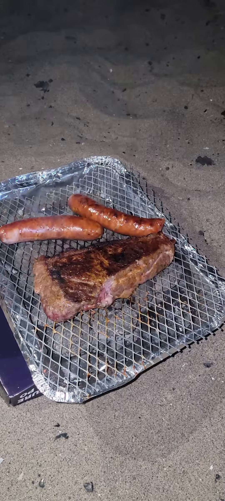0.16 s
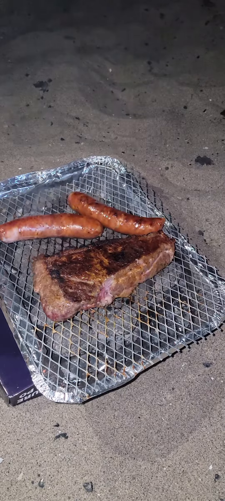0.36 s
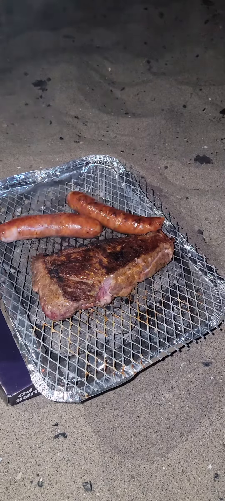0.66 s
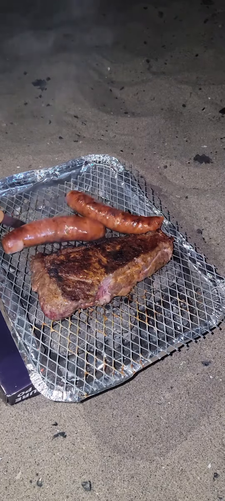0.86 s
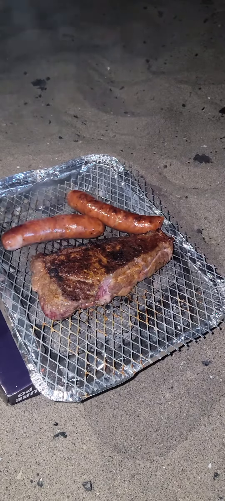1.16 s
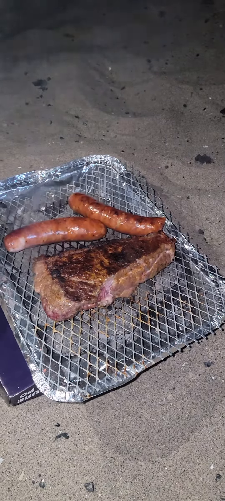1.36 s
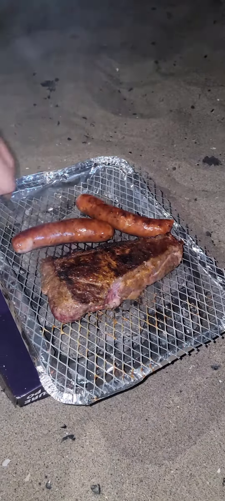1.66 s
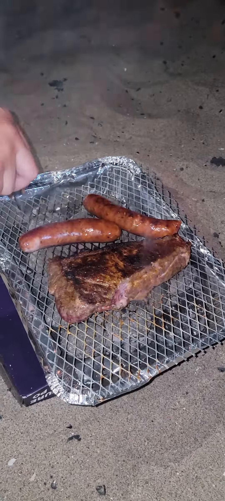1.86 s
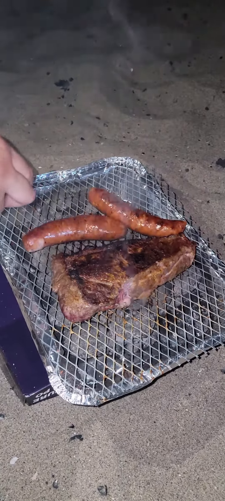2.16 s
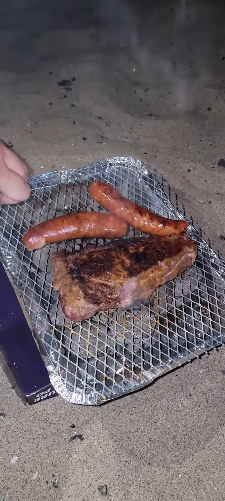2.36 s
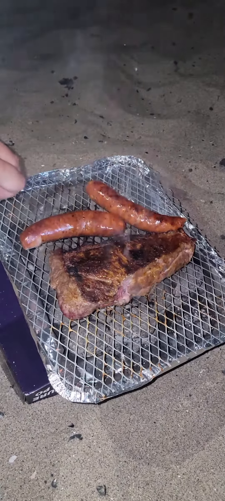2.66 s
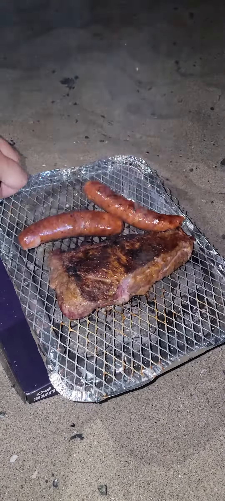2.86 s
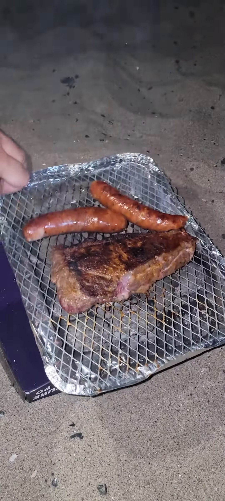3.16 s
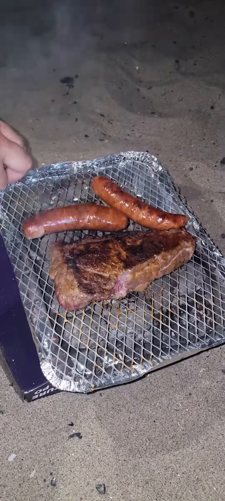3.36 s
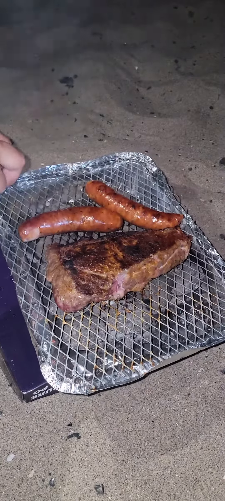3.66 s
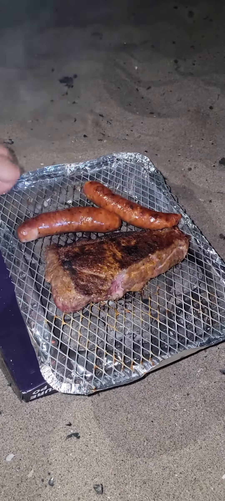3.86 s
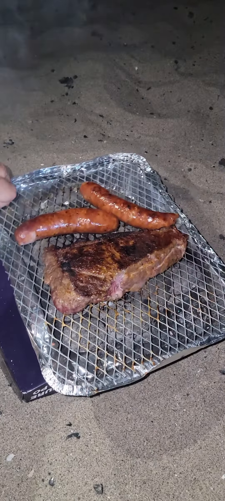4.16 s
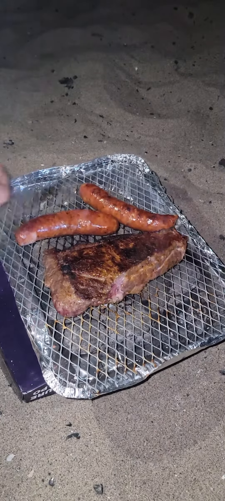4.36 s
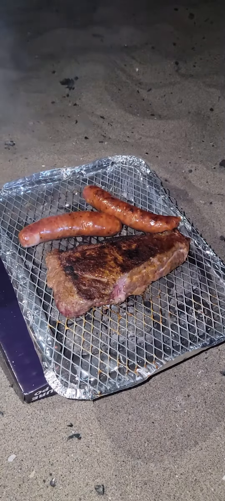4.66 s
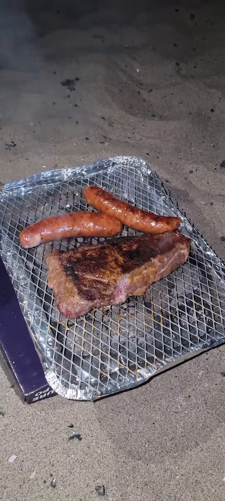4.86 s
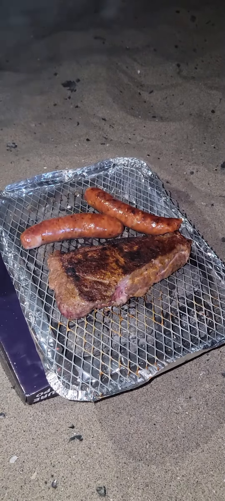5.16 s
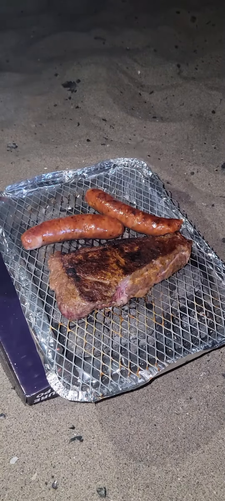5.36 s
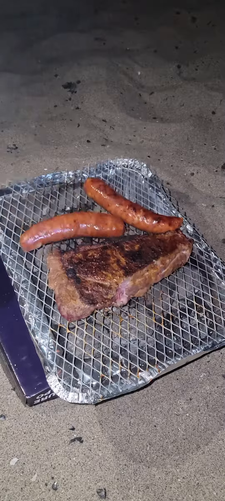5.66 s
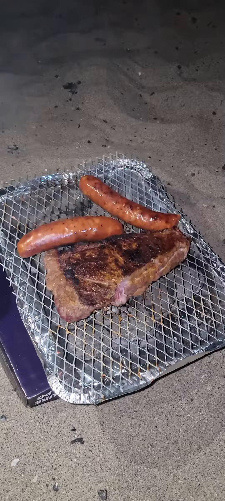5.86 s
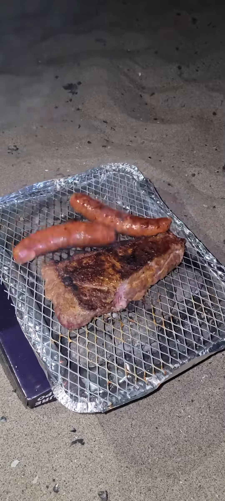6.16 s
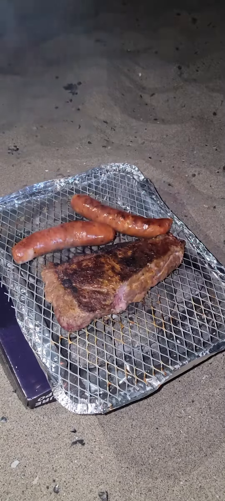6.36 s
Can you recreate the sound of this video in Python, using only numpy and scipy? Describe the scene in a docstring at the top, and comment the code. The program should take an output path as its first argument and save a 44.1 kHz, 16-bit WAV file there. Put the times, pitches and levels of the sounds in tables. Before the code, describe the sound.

A quiet outdoor barbecue heard close up: irregular brittle ticks and crackles with a tinny foil edge, small scratchy rustles and delicate hissing fat. Underneath lie a deep steady rumble and faint air, opening with soft low bumps. Crackling clusters before three seconds, spikes around four and a half as the rumble thins, and becomes busiest and loudest in the last second. A faint low hum swells occasionally.

```python
"""Dry crackles and clicks of meat cooking on a small foil charcoal grill: noise bursts excite tray modes.
Short gritty rustles are dense friction noise with pops, radiated through the same modes.
Fat sizzles as modulated noise with bubble ticks and a few spits; embers tick as random impulses.
Behind lie a low outdoor rumble and a wash of air (shaped noise), a distant wavering hum and soft thuds."""
import sys
import numpy as np
from scipy import signal
from scipy.fft import rfft, irfft
from scipy.io import wavfile
from scipy.ndimage import uniform_filter1d

SR = 44100
rng = np.random.default_rng(int(sys.argv[2]) if len(sys.argv) > 2 else 0)


def wav_out(sig):
    """Save sig, one row per channel (or a flat mono array), as 16-bit PCM at SR to the path in sys.argv[1]."""
    wavfile.write(sys.argv[1], SR, np.round(np.clip(np.atleast_2d(sig).T, -1, 1) * 32767).astype(np.int16))


N = 287532
TIME = np.arange(N) / SR


def amp(db):
    """Logarithmic level law: decibels to amplitude gain."""
    return 10 ** (np.asarray(db) / 20)


def unit(x):
    """Power normalisation: scales to rms 1."""
    return x / np.sqrt(np.mean(x ** 2) + 1e-20)


def add(mix, start_s, sound):
    """Superposition: mixes a stereo sound in at a start time."""
    part = mix[:, max(round(start_s * SR), 0):][:, :sound.shape[1]]
    part += sound[:, :part.shape[1]]


def pan(side_db):
    """Interaural level difference: left and right gains, positive to the left."""
    return amp(np.array([[side_db], [-side_db]]) / 2)


def level_curve(points):
    """Slow level envelope: straight lines in decibels between the given times."""
    return np.interp(TIME, *np.transpose(points))


def colour(points, hz):
    """Spectral envelope: gain interpolated in decibels over log frequency."""
    point_hz, point_db = np.transpose(points)
    return amp(np.interp(np.log(hz + 1), np.log(point_hz + 1), point_db))


def shaped(x, points):
    """Linear filtering in the frequency domain: gives a long sound a colour, at rms 1."""
    hz = np.fft.rfftfreq(N, 1 / SR)
    return unit(irfft(rfft(x) * colour(points, hz), N))


def causal(gain):
    """Minimum phase from the Hilbert transform of log gain: responses ring after a blow, never before."""
    mirrored = np.c_[gain, gain[:, -2:0:-1]]
    log_gain = np.log(np.maximum(mirrored, 1e-5))
    return np.exp(np.conj(signal.hilbert(log_gain)))[:, :gain.shape[1]]


def wander(corner_hz):
    """Low-passed Gaussian noise: slow random variation of rms 1, falling off above the corner."""
    hz = np.fft.rfftfreq(N, 1 / SR)
    return unit(irfft(rfft(rng.standard_normal(N)) / (1 + (hz / corner_hz) ** 4), N))


def pair(size, alike):
    """Partial coherence: white noise at two microphone ports with correlation `alike`."""
    left, other = rng.standard_normal((2, size))
    return np.array([left, alike * left + np.sqrt(1 - alike ** 2) * other])


def grains(size, depth_db, length_s):
    """Clustering of tiny fractures and slips: smoothed noise as an uneven gain of rms 1."""
    clumps = unit(uniform_filter1d(rng.standard_normal(size), int(length_s * SR)))
    return unit(amp(depth_db * clumps))


def decays(impulses, decay_s):
    """Exponential decay: a one-pole filter lets every impulse die away."""
    return signal.lfilter([1], [1, -np.exp(-1 / (decay_s * SR))], impulses)


def peak(hz, centre_hz, width_hz):
    """Lorentzian resonance: power curve of one damped mode."""
    return 1 / (1 + (2 * (hz - centre_hz) / width_hz) ** 2)


def ring(hz, centre_hz, share, lift_db):
    """Constant-Q resonance: lifts one mode whose width is a share of its pitch."""
    return np.sqrt(1 + amp(lift_db) ** 2 * peak(hz, centre_hz, share * centre_hz))


def ripple(hz, depth_db, width_hz=220):
    """Local modal variation: random peaks and dips for one spot on the grill."""
    heights = rng.standard_normal(len(hz))
    return amp(depth_db * np.interp(hz, width_hz * np.arange(len(hz)), heights))


# Left-over-right difference between the ports hearing the grill: frequency_hz, difference_db
PORT_DIFFERENCE = [(150, -7.5), (280, -5.5), (420, 5.5), (700, 4), (1300, -0.5), (2500, -2.5), (8000, 2.5),
                   (15000, -0.5)]


def ports(gain, hz):
    """Direction-dependent response: the two ports hear one colour a little differently."""
    tilt = np.sqrt(colour(PORT_DIFFERENCE, hz))
    return np.array([gain * tilt, gain / tilt])


# Resonances of the tray: centre_hz, width_hz, lift_db
TRAY_MODES = [(556, 73, 2.5), (600, 30, -12), (969, 17, 5.5), (1110, 110, 4.5), (1241, 28, 5.5),
              (1641, 29, 4.5), (2120, 20, -6), (2536, 29, 3.5), (2756, 36, 4), (2970, 52, 3.5),
              (3172, 57, 5), (3550, 68, 1), (3926, 84, 5.5), (6070, 290, -5), (8970, 1100, 3)]


def tray(points, hz):
    """Modal superposition: the tray's resonances stand out of a broad colour."""
    modes = sum(amp(db) ** 2 * peak(hz, centre, width) for centre, width, db in TRAY_MODES)
    return colour(points, hz) * np.sqrt(1 + modes)


def voiced(drive, gain, low_db, treble_db, low_edge_hz=900, treble_edge_hz=4500):
    """Source-filter principle: a drive rings a colour; low and treble levels are set against the middle band."""
    size = drive.shape[1]
    hz, spectrum = np.fft.rfftfreq(size, 1 / SR), rfft(drive)
    low = 1 / (1 + (hz / low_edge_hz) ** 8)
    below_treble = 1 / (1 + (hz / treble_edge_hz) ** 8)
    power = 2 / size * np.mean(abs(spectrum * gain) ** 2, 0)
    bands = zip((low, below_treble - low, 1 - below_treble), (low_db, 0, treble_db))
    balance = sum(band * amp(db) / np.sqrt(np.sum(power * band)) for band, db in bands)
    return irfft(spectrum * causal(gain * balance), size)


# Colour of the outdoor rumble: frequency_hz, gain_db
RUMBLE_COLOUR = [(12, -28), (20, -29), (55, -2), (75, 1), (174, -8), (206, -12), (260, -11.5), (297, -16),
                 (450, -30.5), (580, -81), (990, -120)]
# Relative level of the rumble over time: time_s, level_db
RUMBLE_LEVEL = [(0.0, -34), (0.14, -28.5), (0.23, -34), (0.65, -35), (1.91, -34), (2.03, -35.5),
                (3.98, -40.5), (4.19, -43.5), (4.67, -48), (5.77, -41.5), (5.96, -40.5), (6.52, -38)]
# Colour of the wash of air: frequency_hz, gain_db
AIR_COLOUR = [(120, 1), (200, 8), (330, 7.5), (550, 4), (800, -0.5), (1200, -5.5), (2000, -11.5),
              (3200, -14.5), (4600, -19.5), (8000, -27), (16000, -40)]
# Relative level of the air, which the embers also follow: time_s, level_db
AIR_LEVEL = [(0.0, -43.5), (0.56, -47.5), (1.71, -46), (1.87, -51), (2.14, -51), (2.54, -51.5),
             (3.29, -50.5), (4.43, -51.5), (4.56, -52), (4.9, -58), (5.17, -55.5), (5.5, -47.5), (5.9, -46),
             (6.26, -46.5), (6.41, -41), (6.52, -53)]


def outdoors(rumble_gain_db=1.5, air_gain_db=1.82, rumble_side_db=-1.0, air_side_db=3):
    """Coherent and diffuse fields: a rumble nearly alike at both ports, under an almost uncorrelated wash."""
    rumble_db = level_curve(RUMBLE_LEVEL) + rumble_gain_db + 0.7 * wander(8.5)
    air_db = level_curve(AIR_LEVEL) + air_gain_db + 1.6 * wander(1.7)
    rumble = shaped(pair(N, 0.97), RUMBLE_COLOUR) * amp(rumble_db)
    air = shaped(pair(N, 0.019), AIR_COLOUR) * amp(air_db)
    return pan(rumble_side_db) * rumble + pan(air_side_db) * air


# Swells of the distant hum, pitch before its drift: start_s, length_s, level_db, pitch_hz
HUM_SWELLS = [(3.963, 0.23, -40, 90.6), (4.656, 0.58, -41, 91), (5.826, 0.37, -40, 101.1)]


def hum(drift_hz=2.31, ramp_s=0.027, sag_db=-6):
    """Frequency modulation of a sine: each swell rises, sags and stops while its pitch drifts."""
    out, drift = np.zeros(N), drift_hz * wander(4.9)
    for start, length, level_db, pitch_hz in HUM_SWELLS:
        t = np.clip(TIME - start, 0, length)
        gate = np.minimum(np.minimum(t, length - t) / ramp_s, 1)
        phase = 2 * np.pi * np.cumsum(pitch_hz + drift) / SR
        out += gate * amp(level_db + sag_db * t / length) * np.sin(phase)
    return np.sqrt(2) * out


# Soft low thuds, pitch before its wavering: middle_s, length_s, pitch_hz, level_db
THUDS = [(0.081, 0.09, 117.3, -24), (0.084, 0.088, 180.2, -29.5), (0.207, 0.085, 67.5, -32),
         (2.926, 0.066, 101, -32)]


def thuds(waver=0.12):
    """Windowed oscillation: a few low cycles swell and die away, the same at both ports."""
    out = np.zeros((2, N))
    for middle, length, pitch_hz, level_db in THUDS:
        count = int(length * SR)
        bends = np.interp(np.linspace(0, 1, count), np.linspace(0, 1, 10), rng.standard_normal(10))
        phase = 2 * np.pi * np.cumsum(pitch_hz * (1 + waver * bends)) / SR
        thud = np.sin(phase) * np.hanning(count)
        add(out, middle - length / 2, np.sqrt(2) * amp(level_db) * pan(0) * thud)
    return out


# Colour of the sizzle and of the spits: frequency_hz, gain_db
SIZZLE_COLOUR = [(1500, 10), (4000, -1), (6500, -1.5), (9000, -3.5), (10500, -4), (14000, 0.5),
                 (16000, 2.5)]
# Relative level of the sizzle over time: time_s, level_db
SIZZLE_LEVEL = [(0.0, -59.5), (0.58, -59), (0.76, -60.5), (1.2, -57), (1.61, -68.5), (1.91, -63),
                (2.23, -58), (2.58, -67), (2.78, -59.5), (3.23, -63), (3.63, -59.5), (3.85, -64),
                (5.06, -65.5), (6.52, -59.5)]


def sizzle(ticks_per_s=60, spread_db=3.5, ticks_db=-6, tick_decay_s=0.00071, side_db=4.5, gain_db=8):
    """Modulated noise plus a Poisson process: fat hisses on the coals; tiny bubbles burst out of the hiss."""
    chance, heft = rng.random(N), np.minimum(rng.exponential(1, N), 4)
    bursts = (chance < ticks_per_s / SR) * amp(spread_db * heft)
    ticks = pair(N, 0.087) * decays(bursts, tick_decay_s)
    hiss = pair(N, 0) * amp(0.53 * wander(25))
    fat = shaped(hiss + amp(ticks_db) * unit(ticks), SIZZLE_COLOUR)
    return amp(level_curve(SIZZLE_LEVEL) + gain_db) * pan(side_db) * fat


# Thin spits of fat, level before filtering and a common gain: start_s, level_db
FAT_SPITS = [(0.027, -45), (4.866, -54.5), (5.084, -54.5)]


def spits(decay_s=0.0028, side_db=6, gain_db=9, size=2048):
    """Impulsive release: a larger bubble of fat bursts as decaying noise in the colour of the sizzle."""
    out, t, hz = np.zeros((2, N)), np.arange(size) / SR, np.fft.rfftfreq(size, 1 / SR)
    bright = causal(ports(colour(SIZZLE_COLOUR, hz), hz))
    for start, level_db in FAT_SPITS:
        burst = irfft(rfft(pair(size, 0.3) * np.exp(-t / decay_s)) * bright, size)
        add(out, start, amp(level_db + gain_db) * pan(side_db) * burst)
    return out


def embers(per_s=40, spread_db=1.5, gain_db=-8.5, decay_s=0.0066):
    """Poisson process through tray modes: faint random ticks of the coals, placed across the stereo width."""
    chance, luck, place = rng.random((3, N))
    heft = np.minimum(-np.log(1 - luck), 3)
    ticks = (chance < per_s / SR) * amp(spread_db * heft) * np.sqrt([place, 1 - place])
    drive = pair(N, 0.033) * decays(ticks, decay_s)
    hz = np.fft.rfftfreq(4096, 1 / SR)
    body = irfft(causal(ports(tray(CRACKLE_COLOUR, hz), hz)))
    sound = unit(signal.oaconvolve(drive, body, axes=1)[:, :N])
    return amp(level_curve(AIR_LEVEL) + gain_db) * sound


# Colour of a rustle: frequency_hz, gain_db
RUSTLE_COLOUR = [(60, -8), (200, -10), (450, 2), (800, 2), (1200, -1), (2000, -1.5), (3500, -10),
                 (4600, -10), (6500, -9), (9000, -19), (10500, -20.5), (14500, -16), (16500, -32)]
# Gritty rustles, low and treble against the middle band, length between half-power points:
# middle_s, length_s, level_db, low_db, treble_db
RUSTLES = [(0.238, 0.037, -50, 4, -4), (1.622, 0.052, -44, 4, -21), (1.806, 0.052, -39, -5, -15),
           (2.408, .055, -41.5, -5, -11), (2.574, 0.037, -48, -2, -8.5), (2.667, 0.038, -43, -3, -8),
           (2.857, 0.055, -40.5, -3.5, -12.5), (3.03, 0.043, -51, 0, -12.5),
           (3.161, 0.1, -48.5, -2.5, -8.5), (3.474, .052, -47.5, 0.5, -13), (3.798, .044, -49.5, 5.5, -11),
           (4.204, 0.052, -48.5, -5, -11), (4.452, 0.026, -25, -1.5, -3.5), (4.489, 0.026, -27, -4, -11),
           (5.321, 0.042, -48, 5, -8), (5.402, 0.069, -39.5, -6.5, -10), (5.466, 0.032, -44.5, 1, -11),
           (6.068, 0.054, -45.5, -6, -4.5), (6.148, 0.058, -43.5, -2.5, -13), (6.388, 0.041, -33.5, 1, -15)]


def rustles(grain_db=3, grain_s=0.0018, pops_per_s=130, pop_size=1.86, pop_s=0.00086, steep=3,
            ring_hz=1300, ring_share=0.14, ring_db=1, ripple_db=2.5, side_db=2.5, alike=0.3, size=16384):
    """Friction noise: dense slips in grains, dotted with little pops, swell and fade in the same tray."""
    out, hz = np.zeros((2, N)), np.fft.rfftfreq(size, 1 / SR)
    t = (np.arange(size) - size / 2) / SR
    body = ports(tray(RUSTLE_COLOUR, hz), hz) * ring(hz, ring_hz, ring_share, ring_db)
    for middle, length, level_db, low_db, treble_db in RUSTLES:
        swell = 1 / np.sqrt(1 + abs(2 * t / length) ** (2 * steep))
        pops = pop_size * decays(1.0 * (rng.random(size) < pops_per_s / SR), pop_s)
        drive = pair(size, alike) * (grains(size, grain_db, grain_s) + pops) * swell
        sound = voiced(drive, body * ripple(hz, ripple_db), low_db, treble_db)
        add(out, middle + t[0], amp(level_db) * np.sqrt(length * SR) * pan(side_db) * sound)
    return out


# Colour of a crackle and of the ember ticks: frequency_hz, gain_db
CRACKLE_COLOUR = [(60, -44), (200, 2), (500, 2), (900, 0), (1250, 3), (3500, -4.5), (4600, -9.5),
                  (6500, -7.5), (9000, -13.5), (10500, -13.5), (14500, -6), (16500, -5.5)]
# Crackles, level before a common gain, low and treble against the middle band:
# start_s, level_db, low_db, treble_db, lower_ring_hz, upper_ring_hz, decay_s
CRACKLES = [(0.244, -34, -7, -16, 1210, 3250, 0.0038), (0.383, -39, -5, -6, 1070, 4900, .005),
            (1.2228, -37, -2, -3.5, 1450, 2480, 0.0045), (1.4146, -36.5, -2, -16, 1030, 2960, 0.0032),
            (1.821, -38.5, -2, -18, 1500, 2750, 0.0034), (1.896, -52.5, 18, -6, 560, 2660, 0.0032),
            (2.229, -43.5, -6, -1.5, 1320, 2550, 0.0038), (2.3688, -34.5, -1.5, -10.5, 1290, 2380, 0.0058),
            (2.423, -30, -22, -5, 2240, 3700, 0.0037), (2.4448, -28.5, -9.5, 3, 1390, 3030, 0.0033),
            (2.668, -35.5, -11, -2.5, 1100, 3270, 0.0034), (2.730, -35, -10, -15.5, 1185, 3240, 0.004),
            (2.896, -24.5, -20, -6, 1600, 3060, 0.0045), (2.904, -23.5, -10, -2.5, 1570, 3130, 0.0046),
            (3.195, -36, 4, -9.5, 1160, 3350, 0.0035), (3.2263, -37, -9, -7, 1120, 2300, 0.0027),
            (3.414, -31, -20, -6.5, 1280, 3000, 0.0083), (3.421, -27, -16, -6, 2990, 3580, 0.0053),
            (3.551, -39.5, -2.5, -11.5, 1330, 2400, 0.0035), (3.7273, -35.5, -3.5, 0, 2000, 4340, 0.0059),
            (3.786, -41.5, 3, -2.5, 1080, 3250, 0.0043), (4.433, -19.5, -3, -2, 1260, 2400, .005),
            (4.468, -34.5, 5.5, 0, 600, 3880, .0028), (4.488, -29.5, 3, 2.5, 990, 3570, 0.0047),
            (5.203, -38, 3.5, -8, 950, 2820, 0.012), (5.218, -33, -3.5, -5, 940, 2980, 0.0041),
            (5.413, -39, 9, -5, 535, 3340, 0.0046), (5.5711, -34.5, 7.5, -17, 640, 3300, 0.0022),
            (5.595, -29.5, -4, -5, 1180, 3600, 0.0049), (5.683, -31, -2.5, -8, 1020, 3750, 0.0056),
            (5.775, -42, -23, -17, 1460, 3170, 0.0043), (5.810, -24.5, -26, -5, 1230, 3790, 0.0031),
            (5.8497, -27.5, -28, -11, 1540, 3960, .0034), (5.8603, -17.5, -12, -12.5, 1610, 4050, 0.0027),
            (5.905, -38.5, 0, -13, 1480, 3240, 0.0044), (6.028, -30.5, -27, 0.5, 2600, 2920, 0.0017),
            (6.1114, -37.5, -2, -20, 1110, 2980, 0.0023), (6.152, -39.5, -15, -8, 1450, 2500, 0.0026),
            (6.264, -39, -1, 5.5, 1280, 3200, 0.0038), (6.3419, -27, -20, -1, 1110, 3600, 0.0039),
            (6.368, -27, -26, 1.5, 1240, 2510, 0.006), (6.3832, -19, -9, 3, 2170, 2900, 0.0017),
            (6.465, -40, -3, -3.5, 1080, 3220, .0046)]


def crackles(rise_per_s=60, lower_db=9.5, lower_share=0.093, upper_db=7, upper_share=0.17,
             ripple_db=3, grain_db=3.0, grain_s=0.00064, snap=4, snap_s=0.00026, brittle_s=0.0016,
             tail_db=-15, tail_decay_s=0.012, tail_hz=2500, usual_decay_s=0.0033, sparkle_db=-5,
             sparkle_db_per_halving=4.5, alike=0.33, side_db=1.7, spot_side_db=0.4, gain_db=0.5, size=8192):
    """Impact excitation of modes: a ragged burst rings one spot of the tray, with a duller scatter after it."""
    out, t, hz = np.zeros((2, N)), np.arange(size) / SR, np.fft.rfftfreq(size, 1 / SR)
    body = ports(tray(CRACKLE_COLOUR, hz), hz)
    dull = signal.butter(1, tail_hz, fs=SR)
    for start, level_db, low_db, treble_db, lower_hz, upper_hz, decay in CRACKLES:
        crack = pair(size, alike) * grains(size, grain_db, grain_s) * np.exp(-t / decay)
        crack *= 1 + snap * np.exp(-t / snap_s - decay / brittle_s)  # brittle ones break with one hard snap
        scatter = unit(signal.lfilter(*dull, pair(size, 0))) * np.exp(-t / tail_decay_s)
        onset = 1 - np.exp(-t / (rise_per_s * decay ** 2))  # the shortest cracks start most sharply
        drive = onset * (crack + amp(tail_db) * scatter)
        spot = ring(hz, lower_hz, lower_share, lower_db) * ring(hz, upper_hz, upper_share, upper_db)
        spot *= ripple(hz, ripple_db)
        # the shorter a crack, the more it sparkles above about 10 kHz
        top_db = sparkle_db + sparkle_db_per_halving * np.log2(usual_decay_s / decay)
        sparkle = colour([(9800, 0), (11200, top_db)], hz)
        sound = voiced(drive, body * spot * sparkle, low_db, treble_db)
        place = pan(side_db + spot_side_db * rng.standard_normal())  # spots scatter a little left of centre
        # level refers to the energy spread over about 9 ms
        add(out, start, amp(level_db + gain_db) * np.sqrt(0.0087 * SR) * place * sound)
    return out


def scene():
    """Superposition: the grill in front of its outdoor background."""
    background = outdoors() + hum() + thuds()
    grill = sizzle() + spits() + embers() + rustles() + crackles()
    return background + grill


def record(dry):
    """Amplitude and band limiting: clips at full scale, then low-passes at 16 kHz with linear phase."""
    low_pass = signal.firwin(301, 16000, window=("kaiser", 8), fs=SR)
    return signal.oaconvolve(np.clip(dry, -1, 1), low_pass[None], "same", axes=1)


dry = scene()
out = record(dry)
wav_out(out)
```